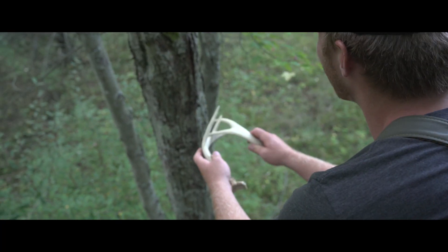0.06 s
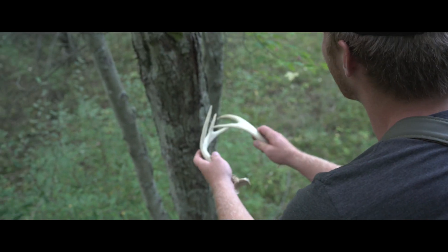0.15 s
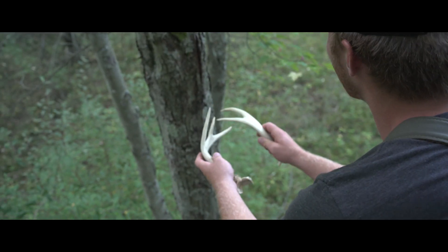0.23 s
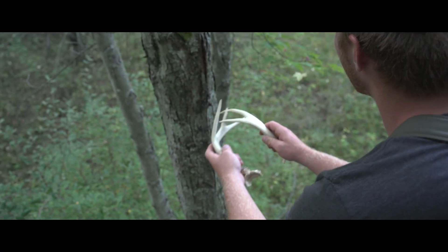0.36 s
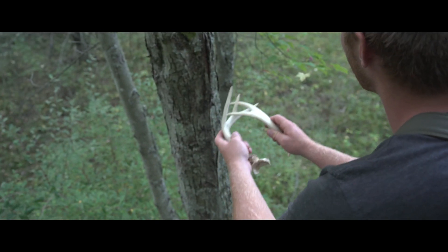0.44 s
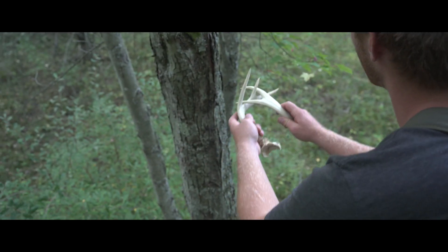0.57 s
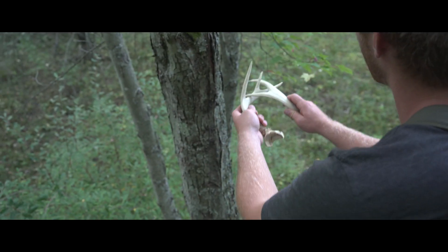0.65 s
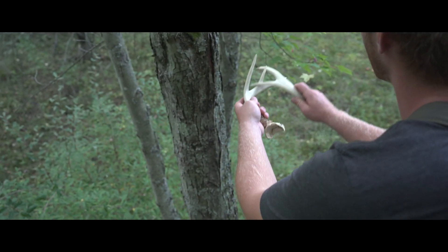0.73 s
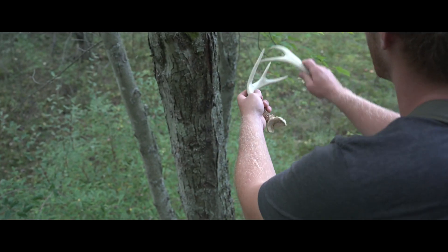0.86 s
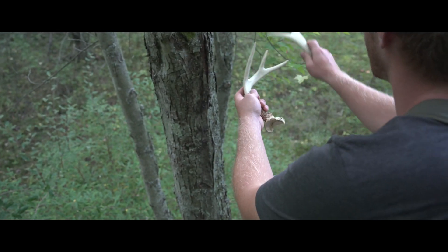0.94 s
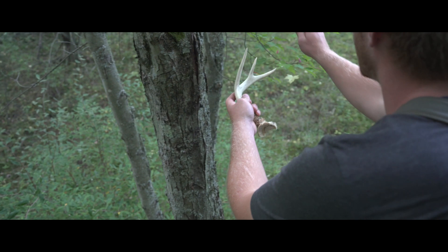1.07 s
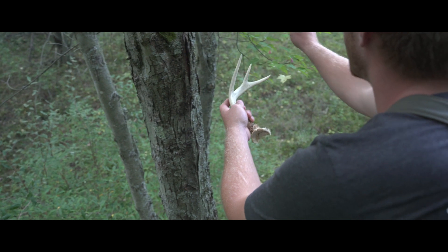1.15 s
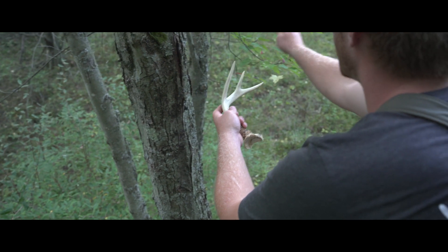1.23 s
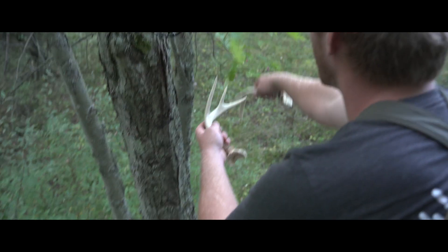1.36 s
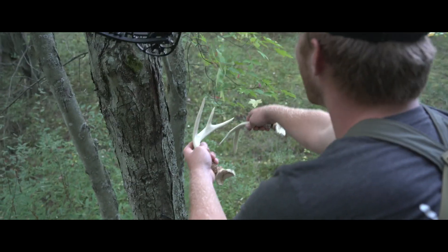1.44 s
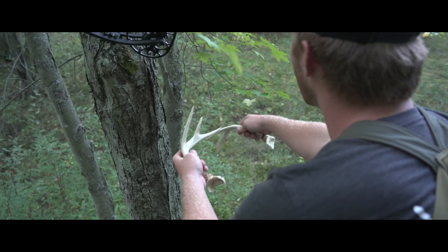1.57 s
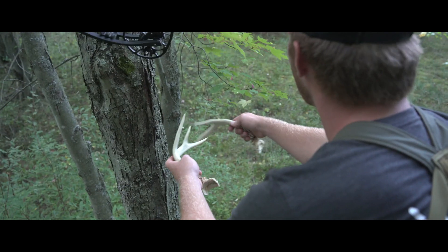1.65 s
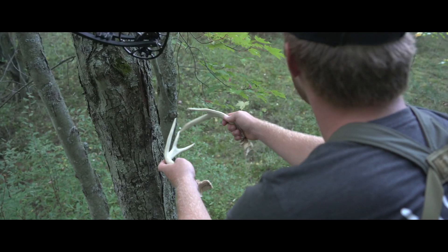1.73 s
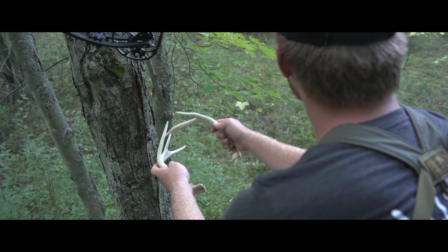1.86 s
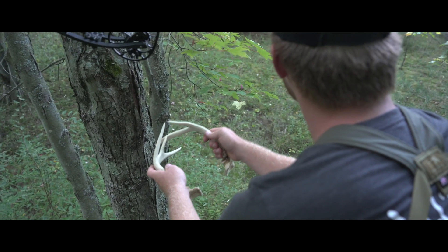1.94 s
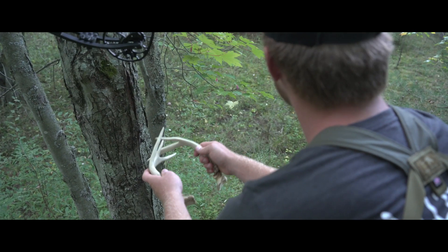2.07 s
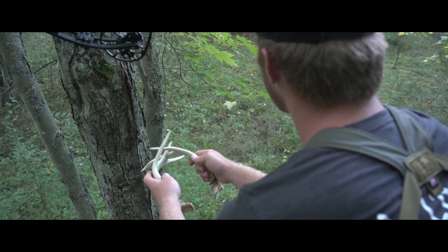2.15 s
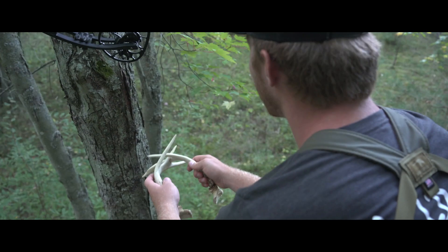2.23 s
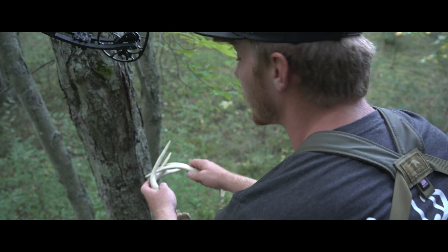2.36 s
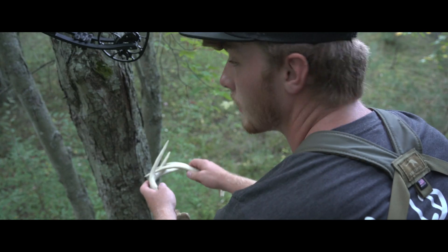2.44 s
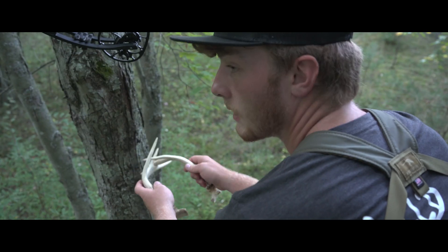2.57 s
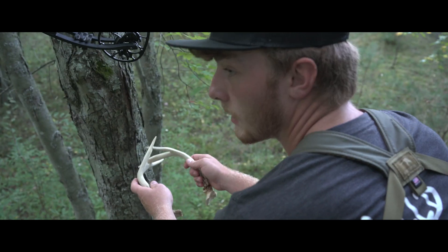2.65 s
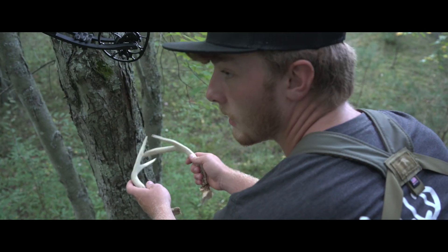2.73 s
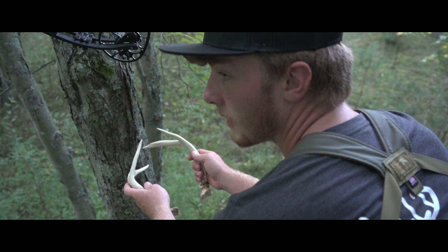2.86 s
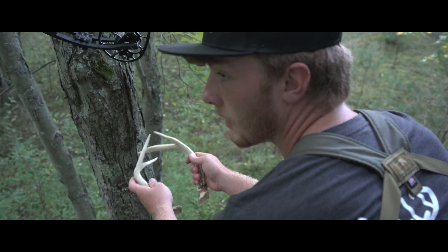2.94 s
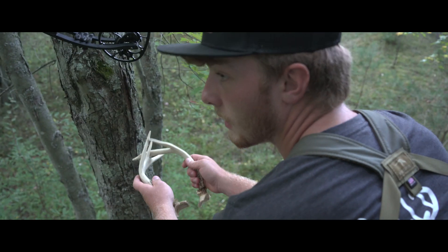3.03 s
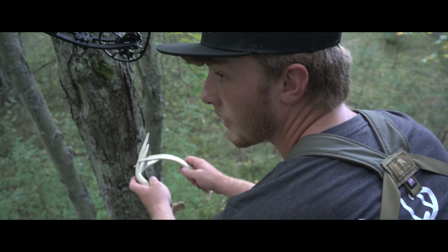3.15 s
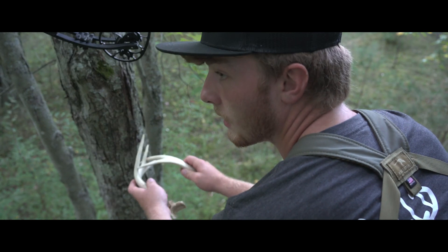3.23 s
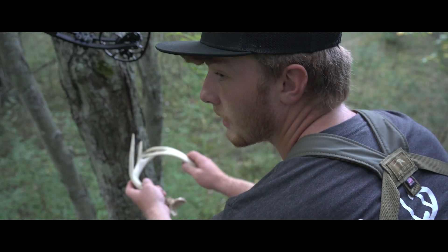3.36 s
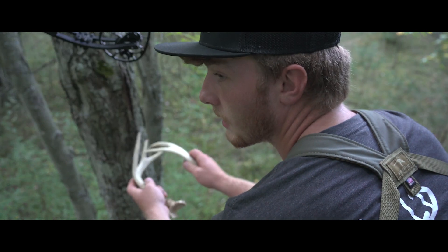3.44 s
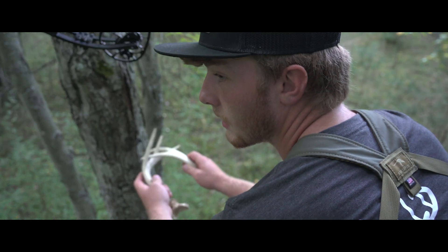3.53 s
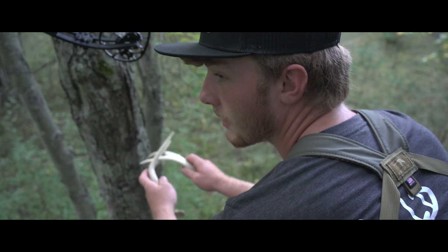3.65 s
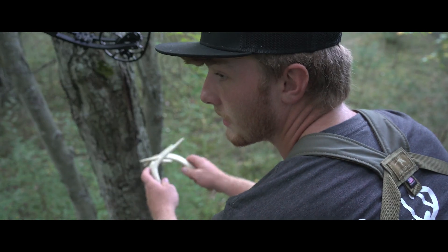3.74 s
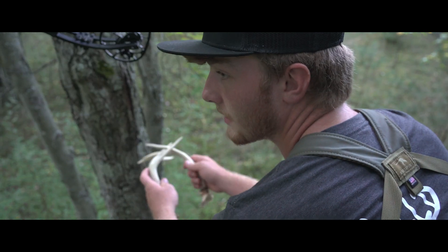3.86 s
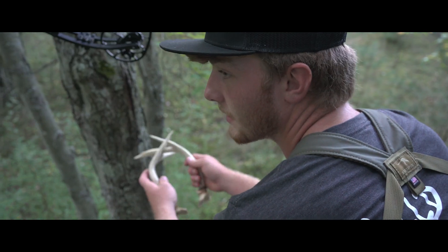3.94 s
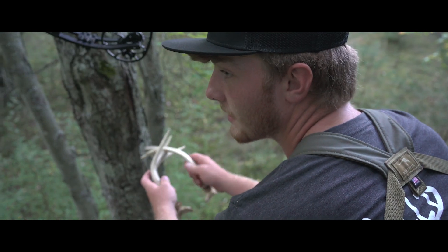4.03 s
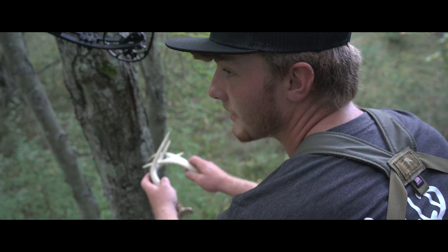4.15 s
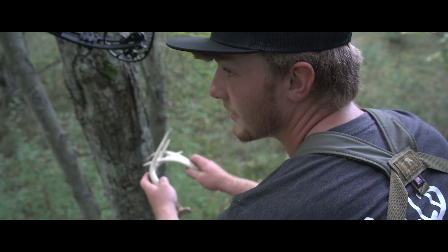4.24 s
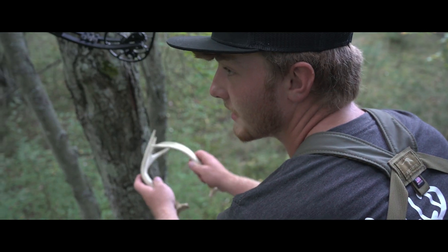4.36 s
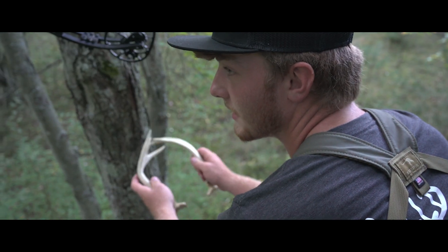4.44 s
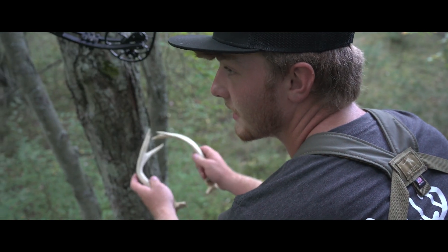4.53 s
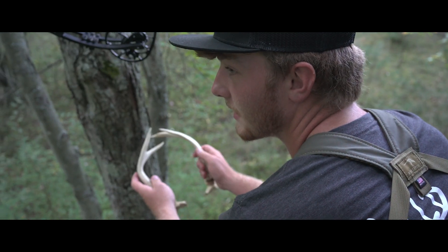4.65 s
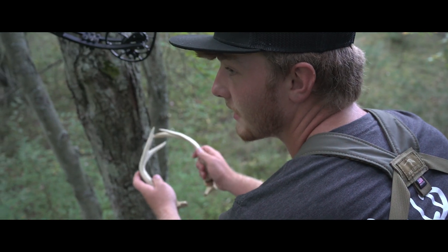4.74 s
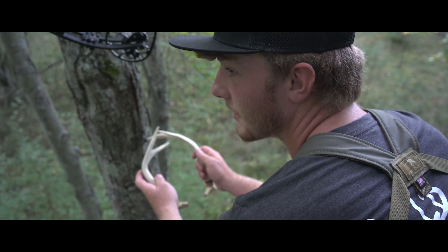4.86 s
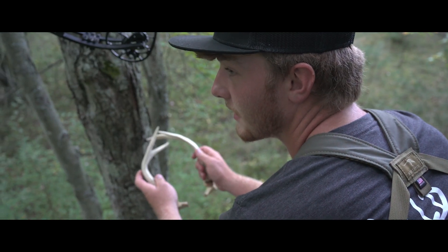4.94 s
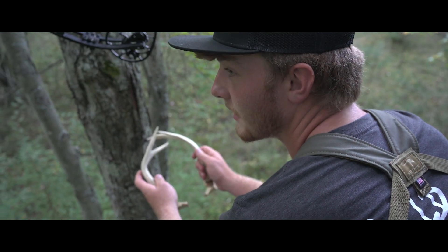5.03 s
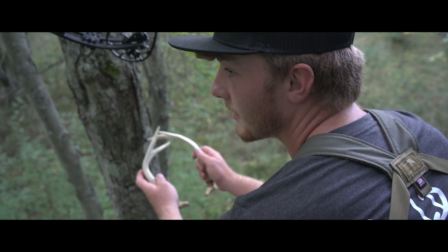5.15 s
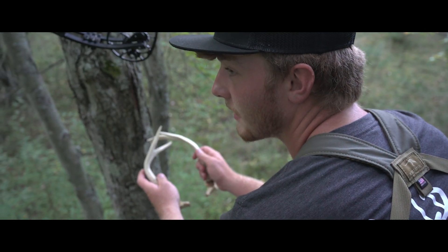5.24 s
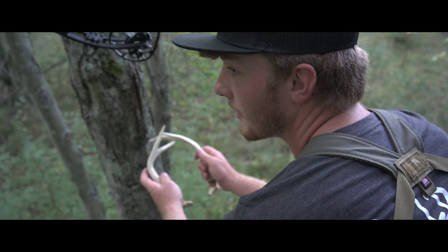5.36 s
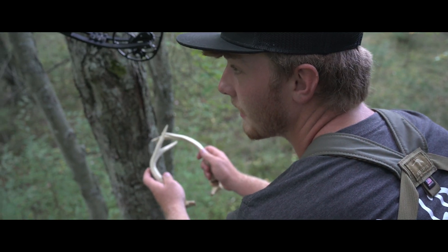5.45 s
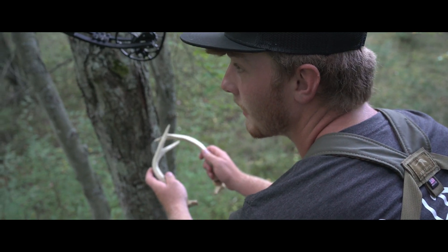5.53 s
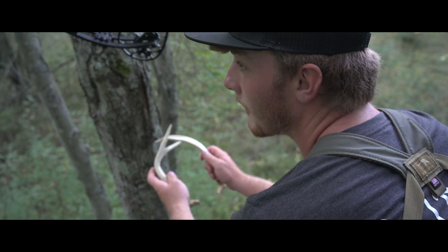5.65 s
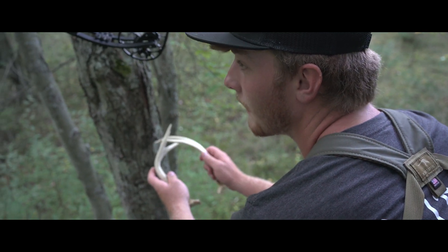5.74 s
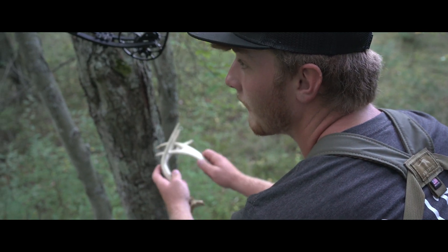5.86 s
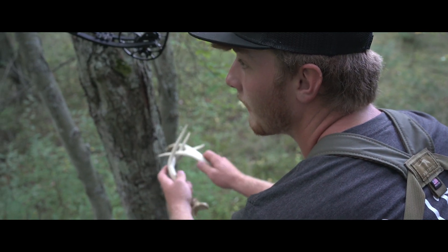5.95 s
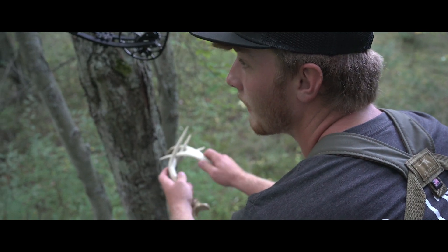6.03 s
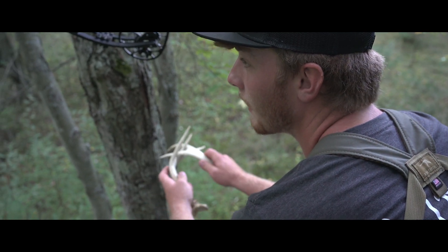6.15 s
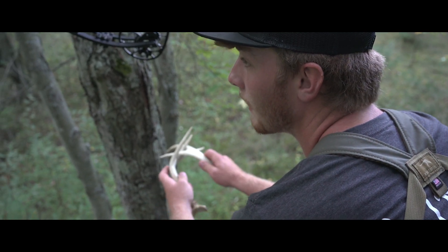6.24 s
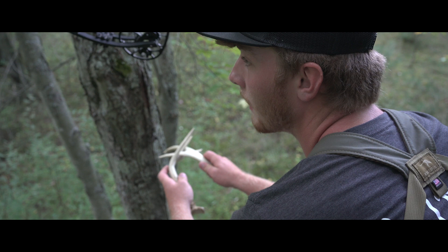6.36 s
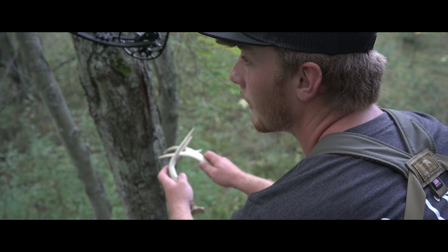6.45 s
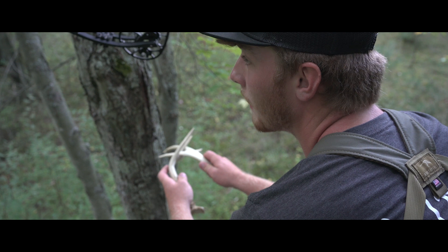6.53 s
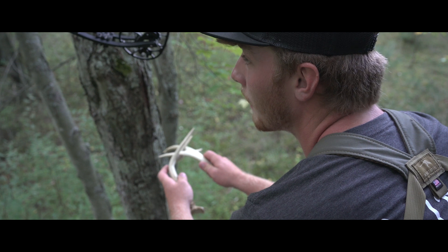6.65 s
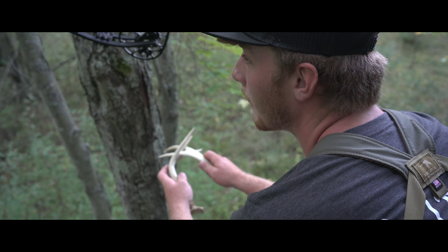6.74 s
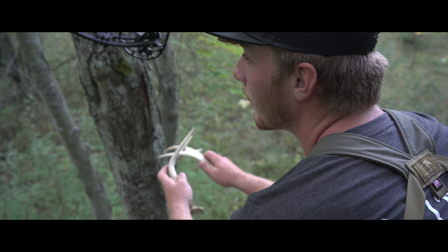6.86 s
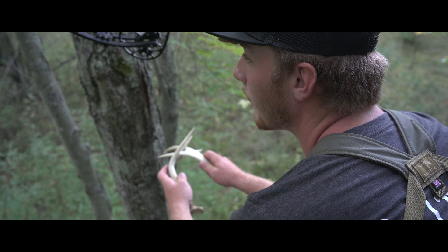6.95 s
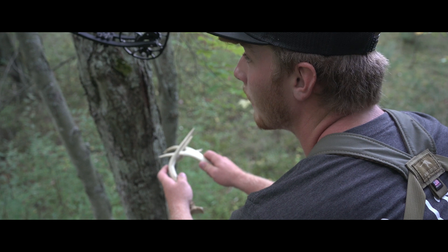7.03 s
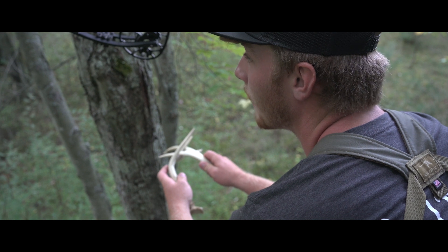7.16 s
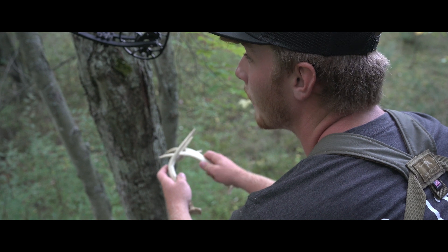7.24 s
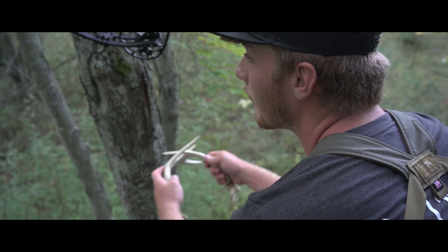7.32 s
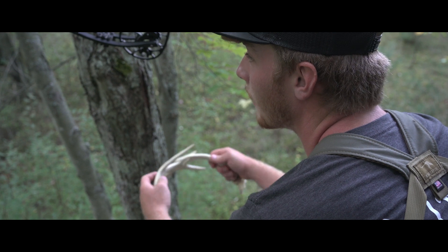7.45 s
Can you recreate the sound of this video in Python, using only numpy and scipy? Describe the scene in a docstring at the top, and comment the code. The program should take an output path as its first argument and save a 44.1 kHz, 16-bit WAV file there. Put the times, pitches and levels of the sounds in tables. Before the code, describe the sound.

In still woods, a steady chorus of crickets shimmers over soft air and a faint distant drone. Up close, antlers tap and scrape lightly, and cloth rustles with a few handling bumps. The antlers then clatter in quick, irregular bursts of bony knocks with little ring. A soft puff of air rumbles in a lull before another short clash and a final one at the end.

```python
"""Antlers rattling in a summer wood

Two hand-held antlers clash: sharp knocks bounce and slide into gritty scrapes, and the grip chokes
the bone's ring. Hands and gear bump and tick, and a sleeve rustles as an arm is raised. One cricket
trills, another chirps and a far chorus shimmers, over a bed of quiet air, low drone and soft puffs."""
import sys
import numpy as np
from scipy import signal
from scipy.fft import rfft, irfft
from scipy.io import wavfile

SR = 44100
rng = np.random.default_rng(int(sys.argv[2]) if len(sys.argv) > 2 else 0)


def dump(signal):
    """Clip the signal to [-1, 1] and save it as 16-bit WAV at the path in sys.argv[1]."""
    limited = np.clip(np.atleast_2d(signal).T, -1, 1)
    pcm = np.round(limited * 32767).astype(np.int16)
    wavfile.write(sys.argv[1], SR, pcm)


N = 330414
TIME = np.arange(N) / SR
RING_TIME = np.arange(SR // 6) / SR

# sharp antler contacts: knocks with rebounds, and the bright peaks that end two scrapes:
# (time [s], level [dB], hardness as crack over body [dB], treble reach [Hz], tine pitch [Hz],
#  bounces [count, rounded], first gap [s], first bounce's loss [dB])
CONTACTS = [(0.14, -44, -12, 9000, 2650, 0, 0, 13), (0.2335, -56, 3.5, 9000, 3600, 0, 0, 0),
            (0.6563, -30, 11.5, 10600, 3620, 0.5, 0, 0), (0.6934, -31, 0, 10700, 3650, 3, 0.012, 4.5),
            (0.9117, -30, 0, 12100, 4040, 1, 0.0023, -3), (2.2154, -17.5, -15, 9050, 1880, 0, 0.0046, 2),
            (2.232, -18.5, -25.5, 8100, 1880, 2, 0.027, 9), (2.2998, -29.5, -28, 8920, 2280, 1, 0.015, 14),
            (2.4346, -21.5, -1, 12500, 3030, 2, .014, 4.5), (2.5623, -32, -21, 9000, 1820, 1, 0.024, 9),
            (2.6467, -21, -2.5, 15470, 5450, 0, 0.0055, 0), (2.666, -24, -0.5, 16000, 5600, 5.5, 0.01, 2.5),
            (2.7856, -32, 4, 15000, 2100, -0.5, 0.0066, 0.5), (3.0445, -23, 1, 18000, 2030, 0.5, 0, -2),
            (3.0671, -24, -3.5, 18000, 1970, 4, 0.011, 3.5), (3.1182, -20, -5, 18000, 3650, 2, 0.01, 3),
            (3.2454, -46, -1, 14000, 2300, 0, 0.01, -18), (3.353, -38.5, -10.5, 10980, 2500, 1, 0.012, 1),
            (3.3865, -30.5, -21.5, 11160, 2890, 1, 0.042, 13.5),
            (3.6106, -18, -15, 11000, 2600, 0.5, 0.028, 15),
            (3.6539, -16, -16, 12000, 2570, 2, .0134, 10.5), (3.8084, -21.5, -13, 9000, 2850, 2, 0.01, 9),
            (4.134, -40.5, -17, 8060, 1800, 0, 0, 0), (4.1996, -22.5, 0.5, 8200, 4640, 2.5, 0.012, 7.5),
            (4.3584, -16.5, -20.5, 8300, 2920, -0.5, 0, 0), (5.702, -48.5, -6, 7010, 2800, 6, 0.027, 1.5),
            (5.9203, -18, -11.5, 9000, 4400, 1, 0.019, 7),
            (5.9545, -16.5, -24.5, 10000, 2300, 0.5, 0.014, 9),
            (5.9704, -20.5, -3, 10000, 4940, 4, .0145, 5.5), (7.3365, -17, -21, 7500, 3180, 2.5, 0.0027, 4),
            (7.4882, -23.5, 2.5, 15000, 3500, -0.5, 0, 2)]
# tine slides along tine:
# (start [s], end [s], swell over the stroke [dB], level [dB], hardness [dB], tine pitch [Hz])
SCRAPES = [(0, 0.145, -17, -52.5, -9, 2770), (0.727, 0.807, 24, -44.5, -10, 2700),
           (0.795, 0.889, 1, -36, -9, 2150), (0.887, 0.922, 5, -37, 3.5, 2820),
           (2.363, 2.418, 0, -42, -25.5, 2090), (2.605, 2.665, 5.5, -40.5, -27, 2100),
           (2.699, 2.788, -4.5, -37.5, -7, 2860), (3.099, 3.137, -1.5, -39, 6, 2180),
           (3.153, 3.26, -8.5, -45, -4.5, 2160), (3.871, 3.95, -1, -54, -19, 2200),
           (3.953, 4.019, 2, -44, -29.5, 2110), (4.068, 4.122, 9, -44, -29, 1850),
           (4.163, 4.21, -5, -52, -19, 2210), (5.721, 5.867, -8.5, -57.5, -11.5, 2700),
           (5.976, 6.018, -7, -30, -13.5, 2930), (7.36, 7.478, 2, -43, -18, 1000)]
# the ring when the thick beams meet, and when the slender tips do: (pitch [Hz], level [dB], t60 [s])
BEAM_MODES = [(671, -27, 0.13), (956, -17, 0.057), (1194, -25.5, 0.0378), (1730, -17.5, 0.058),
              (1887, -10.5, 0.045), (2202, 6, 0.03), (2324, -4, 0.0309), (2565, -2, 0.013),
              (2920, -1.5, 0.029), (3123, -0.5, .025), (3546, -2, 0.037), (3980, -13, 0.053),
              (4230, -6, 0.033), (4600, -16, .035), (5396, 3.5, 0.016), (5710, 0, 0.029),
              (5840, -6.5, 0.017), (6270, -19, .025), (7080, -10, 0.059), (7700, -3, 0.02),
              (8510, -3, .025), (9900, -23.5, .02), (11800, -12, 0.013), (13830, -16, .015)]
TIP_MODES = [(1125, -17, 0.059), (1680, -5, 0.025), (2110, -13, .025), (2264, -1.5, 0.027),
             (2460, 1, 0.019), (2870, -2, 0.066), (3510, 8, 0.023), (3960, 1.5, 0.038), (4300, -2, 0.027),
             (5280, -6, 0.019), (5680, -1, 0.026), (7270, -1, 0.024), (7980, -5, 0.018),
             (9180, -8.5, 0.028)]
BEAMS_FROM_S, BEAMS_UNTIL_S = 1.0, 7.48   # the tips meet outside this span
# the bone's crowd of weak, quickly damped modes: (frequency [Hz], density [dB])
CLATTER_COLOUR = [(250, -21), (600, -10.5), (1000, -4), (1500, -1.5), (2200, 6.5), (3500, -9.5),
                  (4800, -5.5), (7500, -5.5), (9000, -11.5), (10400, -20), (12300, -18), (16000, -26)]
# body, clack and crack of a contact: (low edge [Hz], high edge [Hz])
REGISTERS = [(200, 2700), (2700, 5000), (5000, 18000)]
# short handling sounds: bumps of hands and gear, and a sleeve or strap tick: (time [s], peak [dB])
HANDLING = [(0.4961, -33), (0.6228, -32.5), (1.3355, -31), (1.3483, -30), (1.6628, -22.5), (4.672, -45),
            (5.184, -34)]
# their tone: (frequency [Hz], density [dB])
HANDLING_COLOUR = [(150, -14), (400, 0), (800, 5), (1500, -3.5), (2800, -5.5), (4200, -17), (12000, -33)]
# arm moves that drag the sleeve: (peak time [s], level [dB], 20 dB rise [s], 20 dB fall [s])
ARM_MOVES = [(.5, -56.5, .5, 0.79), (1.13, -55, .3, 0.64), (1.33, -32.5, 0.023, 0.12),
             (1.52, -52, 0.16, 0.17)]
# the hiss of cloth: (frequency [Hz], density [dB])
SLEEVE_COLOUR = [(150, -9), (500, 6), (1200, 2), (3000, 2.5), (6000, 2), (9000, -1.5), (13000, -9.5),
                 (16000, -9)]
# the far crickets' fader ride: (time [s], level [dB])
CHORUS_LEVELS = [(0.0, -51), (0.4, -48.5), (7.49, -49)]
# their massed song: (frequency [Hz], density [dB])
CHORUS_COLOUR = [(3700, -36), (4050, -25.5), (4500, -12.5), (4800, -6.5), (5200, 0), (5480, -3),
                 (5720, -16), (6000, -23.5), (7000, -37.5), (8400, -41.5), (9400, -27), (10100, -23),
                 (10700, -27), (11500, -48.5)]
# the echo off trunks and leaves: (frequency [Hz], level [dB])
ECHO_COLOUR = [(200, -3), (700, 1.5), (1700, -3), (2230, -6), (2800, -6), (4000, 0.5), (7500, 0),
               (10000, 0.5), (16000, -8.5)]
# still air of the wood: (frequency [Hz], density [dB])
AIR_COLOUR = [(20, 0), (55, 4), (100, -5.5), (240, -5), (450, -6), (900, -13), (1600, -18.5), (3000, -21),
              (7000, -24), (12000, -27.5), (16000, -29.5)]
# the far drone's slow swell: (time [s], level [dB])
DRONE_LEVELS = [(0.0, -57), (0.23, -53), (3.23, -57.5), (7.49, -51.5)]
# its low hum: (frequency [Hz], density [dB])
DRONE_COLOUR = [(70, -24.5), (100, -9.5), (120, -5.5), (133, 1.5), (156, -9.5), (177, -2), (205, -13),
                (250, -38), (500, -45.5)]
# puffs of air: (peak time [s], level [dB], 20 dB rise [s], 20 dB fall [s])
PUFFS = [(.55, -48.5, 0.22, 1.2), (1.38, -47, .25, .85), (2.6, -56.5, 0.19, .6), (4.85, -53, 0.87, .8),
         (5.27, -39, 0.22, 0.61)]
# their deep buffeting: (frequency [Hz], density [dB])
RUMBLE_COLOUR = [(12, 3), (30, 1), (60, -9), (100, -16), (250, -37), (1000, -69)]


def sharp_contacts(trim_db=0.5, clatter_db=(-9.0, 0.0, 8.0), clatter_t60=(0.025, 0.024, 0.012)):
    """Each contact rings the bone's body, clack and crack; the first 6 ms set each one's level."""
    out = np.zeros(N)
    attack = round(0.006 * SR)
    for s, db, hardness_db, reach_hz, tine_hz in contact_runs():
        levels = register_levels(db, hardness_db)
        lowpass = signal.butter(4, reach_hz, fs=SR, output="sos")   # a sharper point reaches higher
        for k, (low, high) in enumerate(REGISTERS):
            ring = signal.sosfilt(lowpass, bone_ring(s, low, high, clatter_db[k], clatter_t60[k]))
            add(out, s, from_db(levels[k] + trim_db) * tine_resonance(ring, tine_hz) / np.std(ring[:attack]))
    return out


def contact_runs(gap_shrink=0.77, soften_db=4):
    """Every contact and any repeats, each one quicker and duller than the last."""
    for s, db, hardness_db, reach_hz, tine_hz, bounces, gap_s, loss_db in CONTACTS:
        for k in range(round(bounces) + 1):
            yield s, db - loss_db * np.sqrt(k), hardness_db - soften_db * k, reach_hz, tine_hz
            s += gap_s * gap_shrink ** k


def scrapes(slips_per_s=900, uneven_db=2.0, trim_db=-1.0, clatter_db=(0.0, 0.0, 4.0)):
    """The knobbly surfaces catch and slip, and each slip is a tiny blow."""
    out = np.zeros(N)
    for start, end, swell_db, db, hardness_db, tine_hz in SCRAPES:
        gains = from_db(register_levels(db + trim_db, hardness_db))
        size = round((end - start) * SR)
        slips = rng.random(size) < slips_per_s / SR
        slips[0] = True
        ramp_db = swell_db * np.linspace(-0.5, 0.5, size)
        force = slips * from_db(uneven_db * rng.standard_normal(size) + ramp_db)
        for k, (low, high) in enumerate(REGISTERS):
            ring = bone_ring(start, low, high, clatter_db[k], clatter_t60=0.04)
            rub = signal.fftconvolve(force, ring)
            add(out, start, gains[k] * tine_resonance(rub, tine_hz) / np.std(rub[:size]))
    return out


def bone_ring(s, low, high, clatter_db, clatter_t60, scatter_db=5.5, grip_detune=0.0068):
    """One register's answer to a contact at time s: damped modes over a burst of clatter."""
    t = RING_TIME
    crack_hz = REGISTERS[2][0]
    modes = BEAM_MODES if BEAMS_FROM_S < s < BEAMS_UNTIL_S else TIP_MODES
    bandpass = signal.butter(2, [low, high], "band", fs=SR, output="sos")
    clatter = rms_one(signal.sosfilt(bandpass, noise(CLATTER_COLOUR, size=len(t))))
    ring = from_db(clatter_db) * clatter * decay(t, clatter_t60)
    for hz, db, t60 in modes:
        if low <= hz < high:
            pitch = hz * (1 + grip_detune * rng.normal())   # grip and pressure shift the modes a little
            # the touched spot sets each mode's share; high modes have more nodes to hit or miss
            share_db = scatter_db * min(hz / crack_hz, 1) * rng.normal()
            tone = np.sin(2 * np.pi * (pitch * t + rng.random()))
            ring += from_db(db + share_db) * tone * decay(t, t60)
    rise_s = 0.00027 * crack_hz / high   # high registers speak first
    return ring * (1 - np.exp(-t / rise_s))


def register_levels(db, hardness_db):
    """Levels of body, clack and crack: a harder contact tilts them towards the treble."""
    return db, db - 0.5 + 0.46 * hardness_db, db + hardness_db


def tine_resonance(ring, tine_hz, lift_db=6.5, q=6.9):
    """The touched tine favours the modes near its own pitch."""
    peak = signal.iirpeak(tine_hz, q, fs=SR)
    return ring + (from_db(lift_db) - 1) * signal.lfilter(*peak, ring)


def handling(t60=0.023):
    """Bumps of hands and gear and a sleeve or strap tick die at once, with no clear pitch."""
    out = np.zeros(N)
    for s, db in HANDLING:
        burst = noise(HANDLING_COLOUR, size=len(RING_TIME)) * decay(RING_TIME, t60)
        add(out, s, from_db(db) * burst / np.abs(burst).max())
    return out


def sleeve(grain_db=3.5):
    """Cloth drags in tiny catches, a grainy rustle that follows the arm."""
    rustle = noise(SLEEVE_COLOUR) * from_db(grain_db * drift(700))
    return swells(ARM_MOVES) * rms_one(rustle)


def cricket(pitch_hz, strokes_per_s, duty, droop, waver, level_db, wet_db):
    """Each wing stroke is a short tone that falls in pitch as the wing slows."""
    cycle = np.cumsum(strokes_per_s * (1 + 0.0076 * drift(1.6))) / SR % 1
    stroke = np.minimum(cycle / duty, 1)
    hz = pitch_hz * (1 - droop * (stroke - 0.5) + waver * drift(300))
    envelope = np.sin(np.pi * stroke) * from_db(drift(9.1))
    song = envelope * np.sin(2 * np.pi * np.cumsum(hz) / SR)
    return from_db(level_db) * rms_one(wood_echo(song, wet_db, t60=0.28))


def cricket_chorus(trim_db=0.5, shimmer_db=1.0):
    """Countless far crickets merge into a shimmering band with a faint octave."""
    shimmer = from_db(trim_db + shimmer_db * drift(90))
    return shimmer * level_curve(CHORUS_LEVELS) * noise(CHORUS_COLOUR)


def wood_echo(sound, wet_db, t60, build_s=0.004):
    """Trunks and leaves scatter back a thin tail behind the direct sound."""
    t = TIME[:SR]
    tail = noise(ECHO_COLOUR, size=SR) * decay(t, t60) * (1 - np.exp(-t / build_s))
    return sound + from_db(wet_db) * signal.fftconvolve(sound, tail / np.linalg.norm(tail))[:N]


def still_air(level_db=-56, waver_db=1.1):
    """The wood's air is a soft, dark hush that wavers slightly."""
    return from_db(level_db + waver_db * drift(6.6)) * noise(AIR_COLOUR)


def far_drone(trim_db=-1.5):
    """A distant low hum swells and sinks slowly."""
    return from_db(trim_db) * level_curve(DRONE_LEVELS) * noise(DRONE_COLOUR)


def air_puffs(calm_db=-76):
    """Close puffs of air rumble, with a faint stirring between them."""
    return np.hypot(from_db(calm_db), swells(PUFFS)) * noise(RUMBLE_COLOUR)


def from_db(db):
    return 10 ** (np.asarray(db) / 20)


def rms_one(x):
    return x / np.sqrt(np.mean(x ** 2) + 1e-20)


def decay(t, t60):
    return from_db(-60 * t / t60)


def level_curve(rows):
    """A fader ride through rows of (time [s], level [dB])."""
    return from_db(np.interp(TIME, *np.transpose(rows)))


def swells(rows):
    """The envelope of movements that each rise to a peak and die away."""
    power = np.zeros(N)
    for s, db, rise, fall in rows:
        drop_db = 20 * np.maximum((s - TIME) / rise, (TIME - s) / fall)
        power += from_db(db - drop_db) ** 2
    return np.sqrt(power)


def noise(colour, size=N):
    """Noise with the given spectrum; rms 1."""
    hz, db = np.transpose(colour)
    log_hz = np.log(np.fft.rfftfreq(size, 1 / SR) + 1)
    gain = from_db(np.interp(log_hz, np.log(hz), db))
    return rms_one(irfft(rfft(rng.standard_normal(size)) * gain, size))


def drift(rate):
    """A random wobble with about `rate` turns a second; rms 1."""
    return rms_one(np.interp(TIME * rate, np.arange(N), rng.standard_normal(N)))


def add(out, s, sound):
    """Mix a sound in at time s."""
    start = round(s * SR)
    out[start:start + len(sound)] += sound[:max(N - start, 0)]


def scene():
    """Antlers and handling up front, crickets and quiet air behind, in mono."""
    foreground = wood_echo(sharp_contacts() + scrapes() + handling() + sleeve(), wet_db=-24.0, t60=0.72)
    trill = cricket(pitch_hz=3306, strokes_per_s=40.3, duty=0.76, droop=0.045, waver=0.014,
                    level_db=-59.5, wet_db=-5.5)
    chirp = cricket(pitch_hz=6340, strokes_per_s=11.0, duty=0.4, droop=0.015, waver=0.005,
                    level_db=-72.5, wet_db=-7.0)
    bed = still_air() + far_drone() + air_puffs()
    return (foreground + trill + chirp + bed + cricket_chorus())[None]


def record(dry, ceiling=0.48, cutoff_hz=16000):
    """A soft clip rounds the loudest peaks and a steep low-pass cuts the very top."""
    rounded = dry / (1 + (dry / ceiling) ** 6) ** (1 / 6)
    lowpass = signal.ellip(10, 0.1, 100, cutoff_hz, fs=SR, output="sos")
    return signal.sosfilt(lowpass, rounded)


dry = scene()
out = record(dry)
dump(out)
```